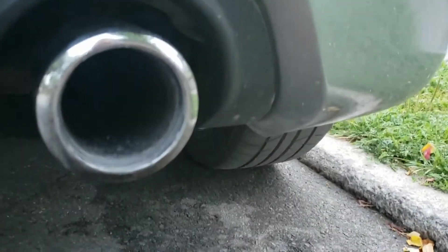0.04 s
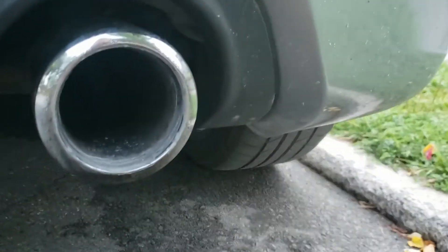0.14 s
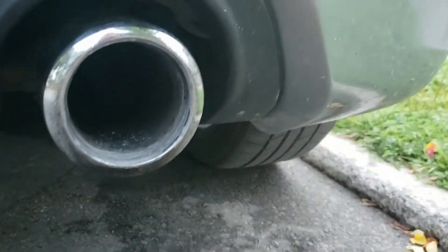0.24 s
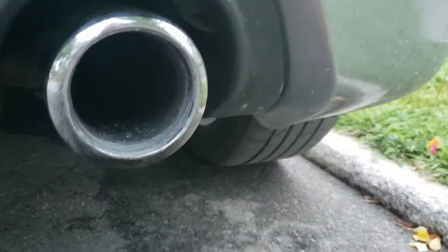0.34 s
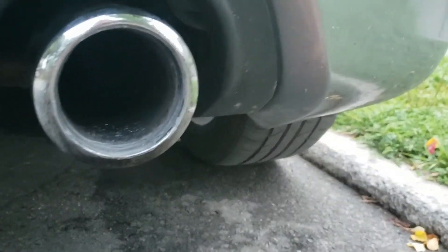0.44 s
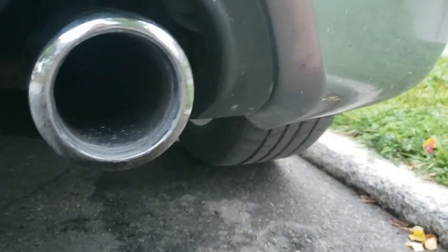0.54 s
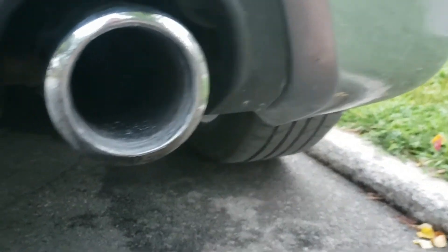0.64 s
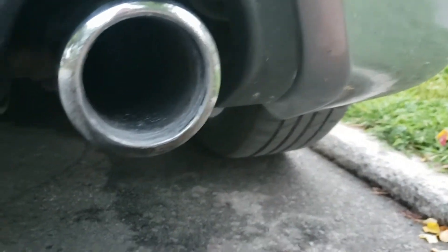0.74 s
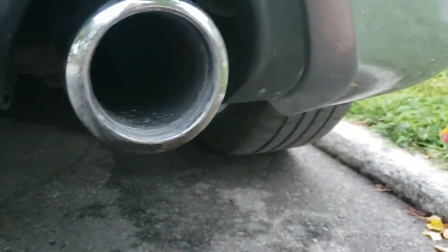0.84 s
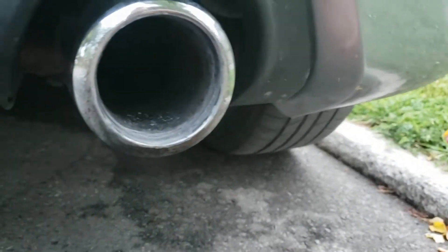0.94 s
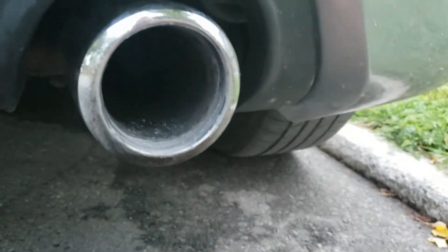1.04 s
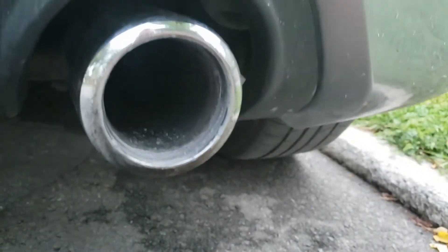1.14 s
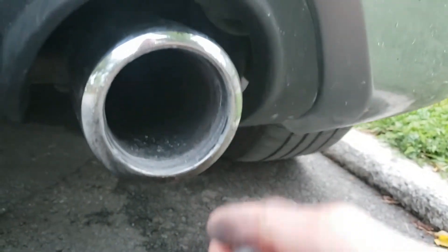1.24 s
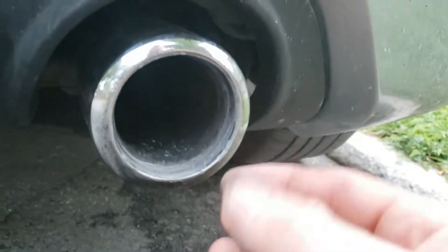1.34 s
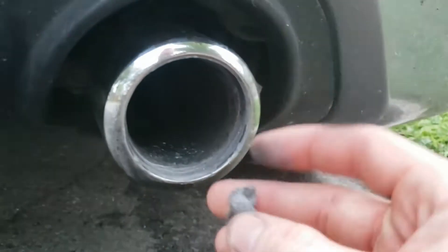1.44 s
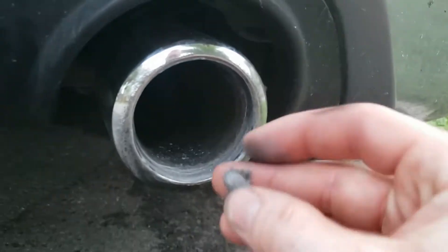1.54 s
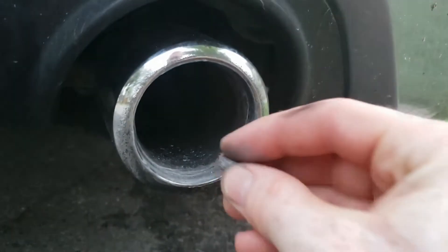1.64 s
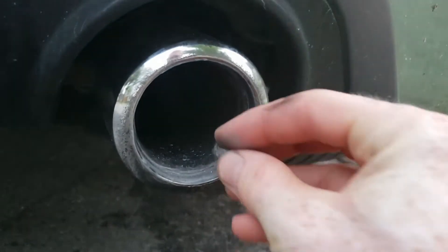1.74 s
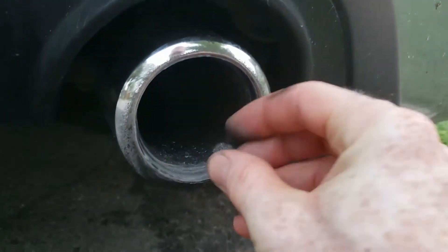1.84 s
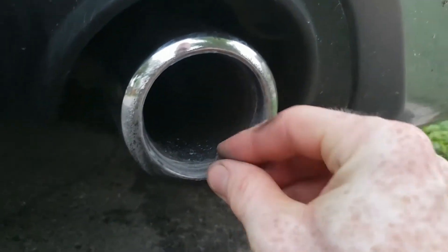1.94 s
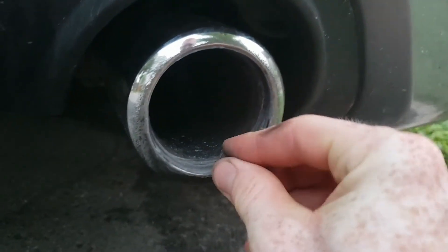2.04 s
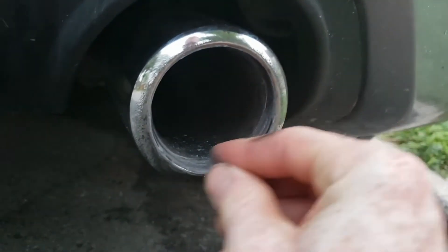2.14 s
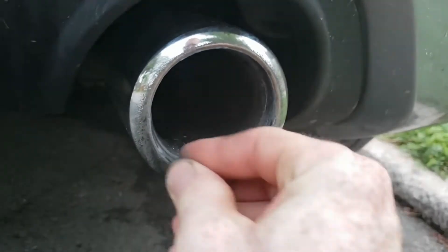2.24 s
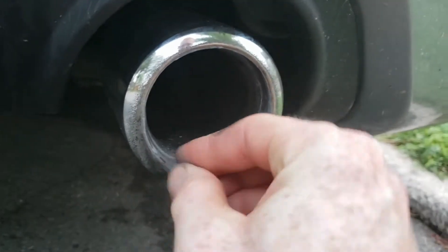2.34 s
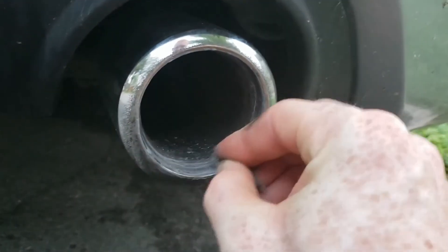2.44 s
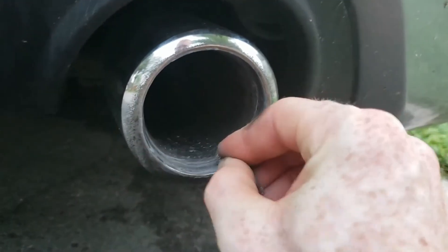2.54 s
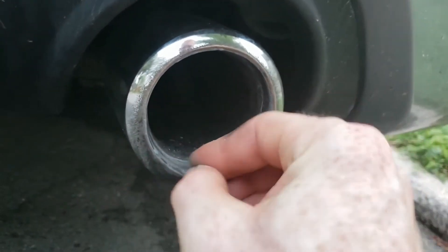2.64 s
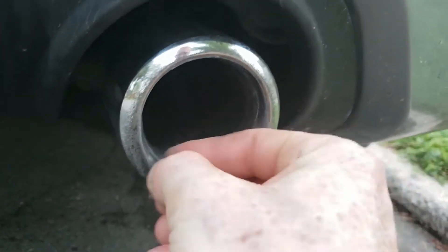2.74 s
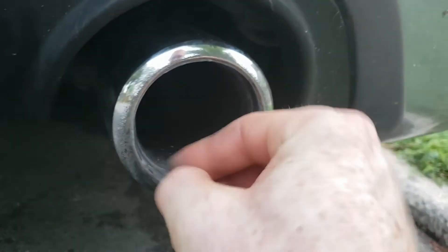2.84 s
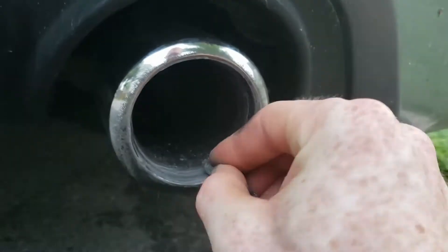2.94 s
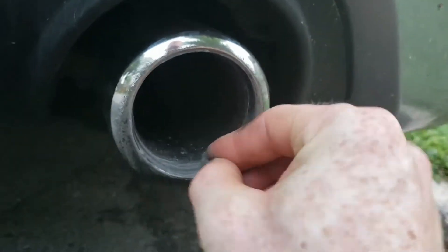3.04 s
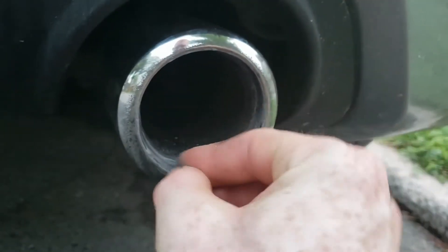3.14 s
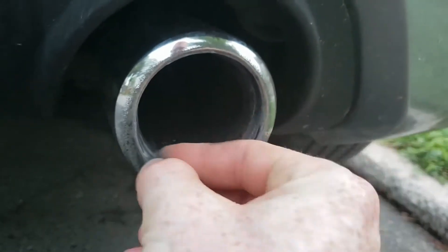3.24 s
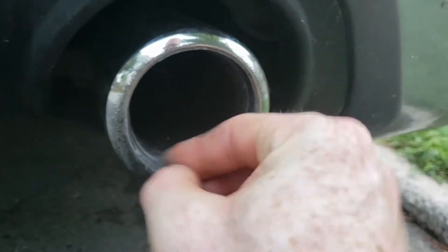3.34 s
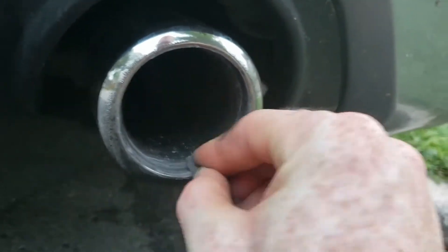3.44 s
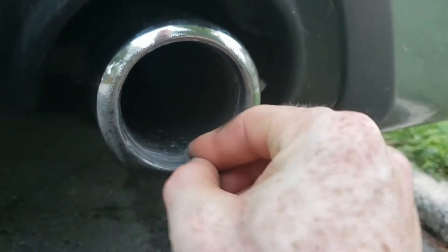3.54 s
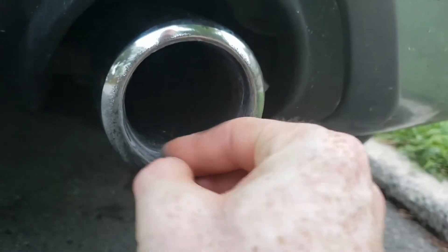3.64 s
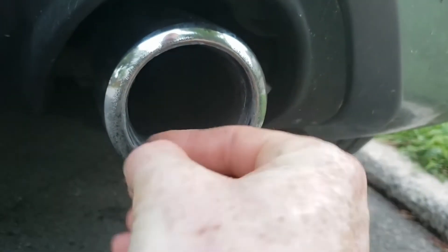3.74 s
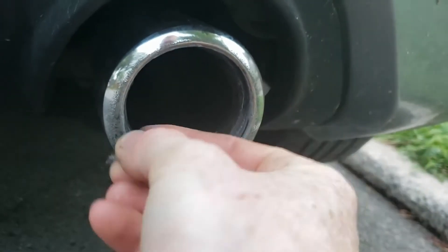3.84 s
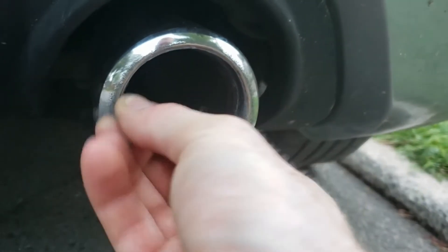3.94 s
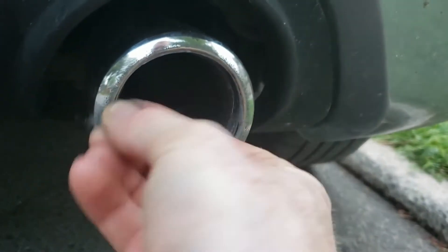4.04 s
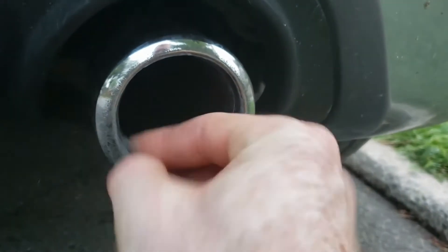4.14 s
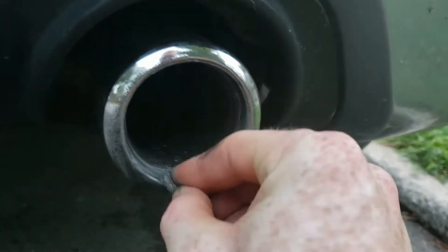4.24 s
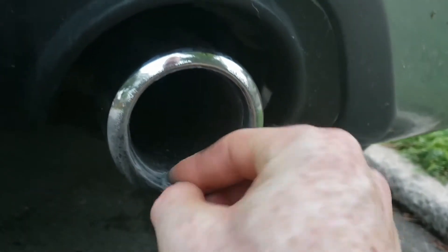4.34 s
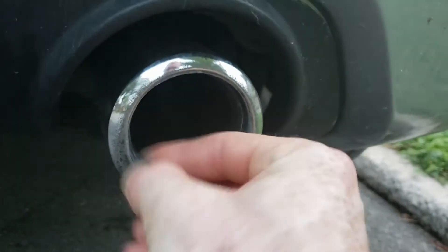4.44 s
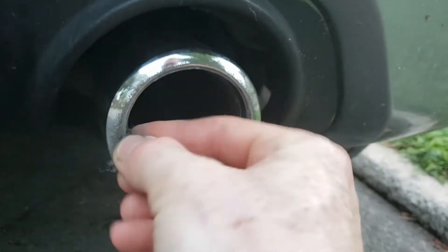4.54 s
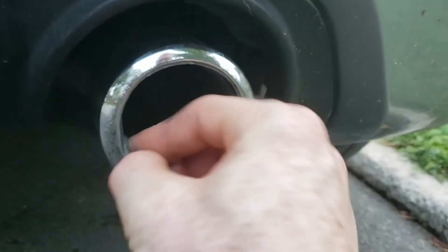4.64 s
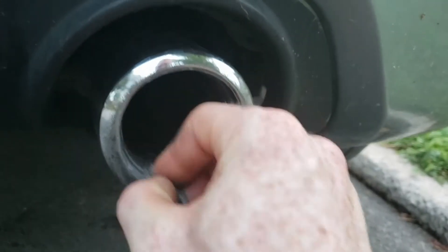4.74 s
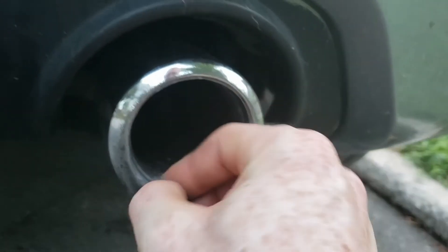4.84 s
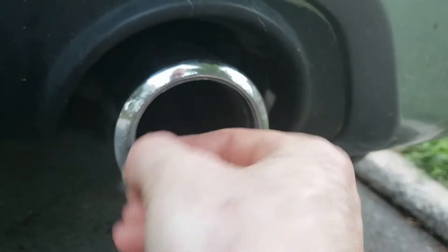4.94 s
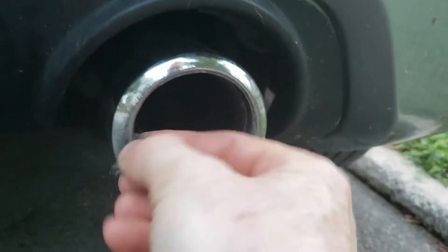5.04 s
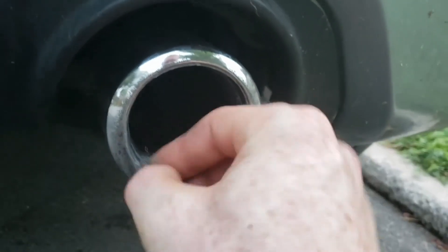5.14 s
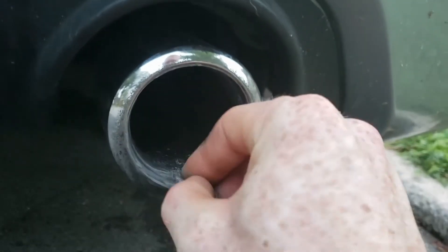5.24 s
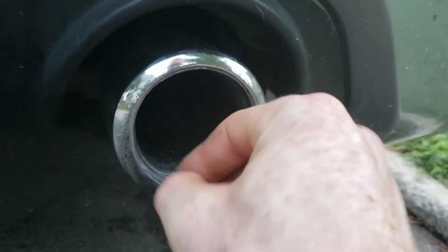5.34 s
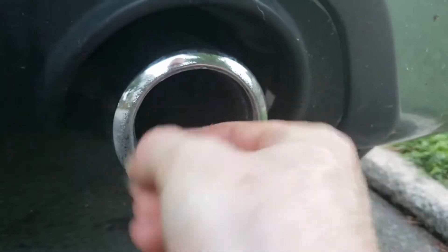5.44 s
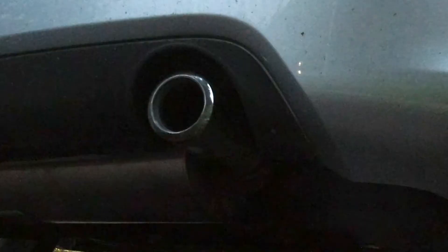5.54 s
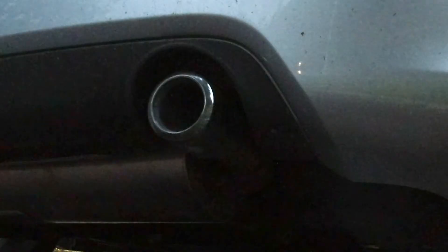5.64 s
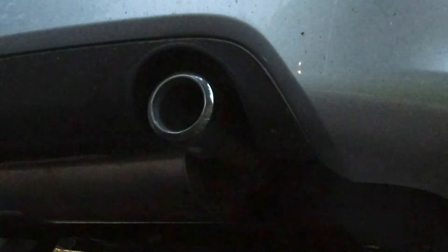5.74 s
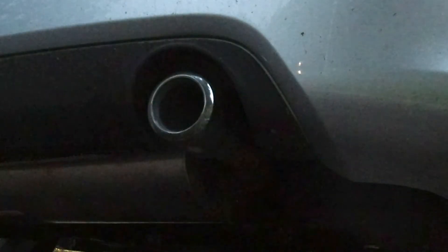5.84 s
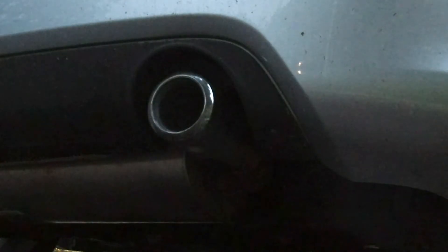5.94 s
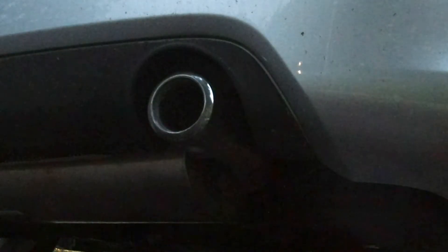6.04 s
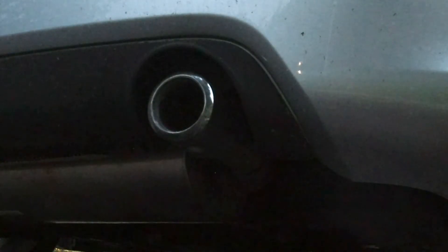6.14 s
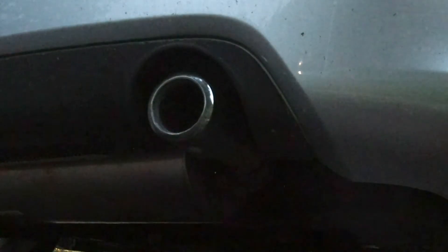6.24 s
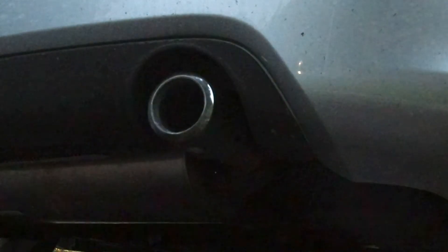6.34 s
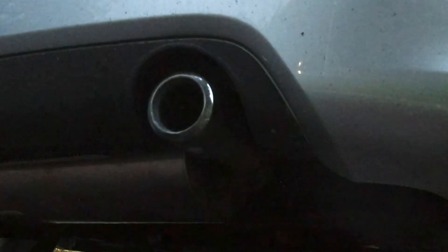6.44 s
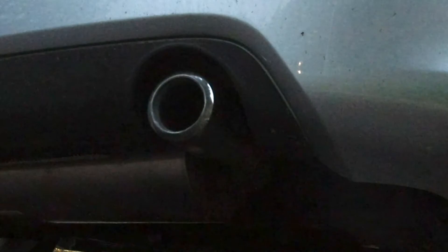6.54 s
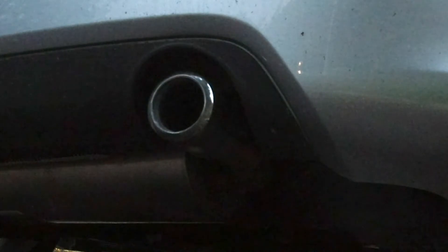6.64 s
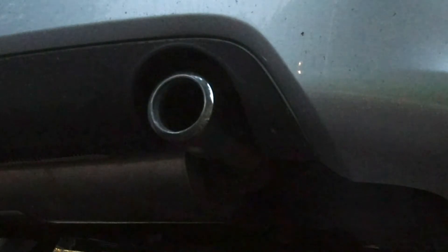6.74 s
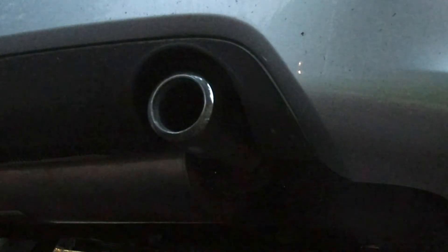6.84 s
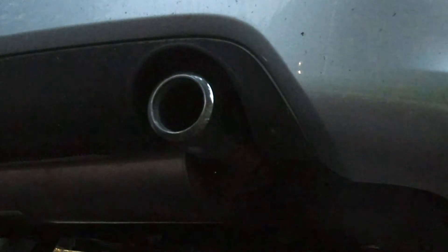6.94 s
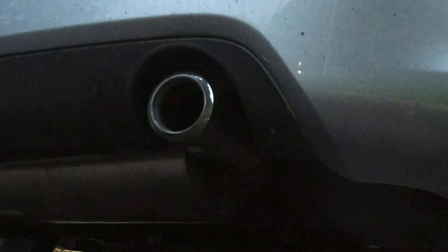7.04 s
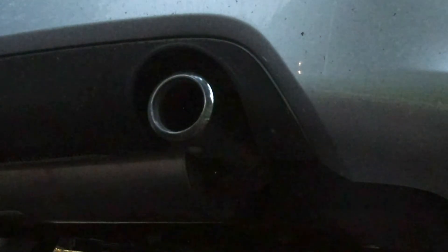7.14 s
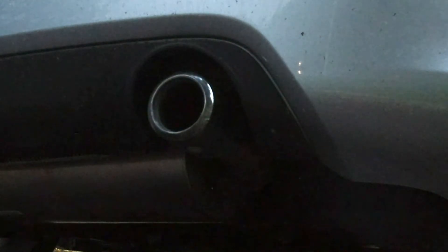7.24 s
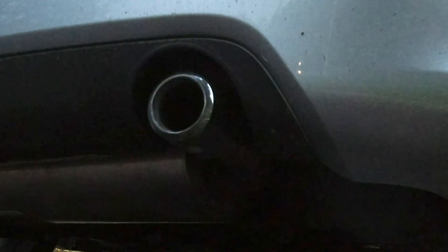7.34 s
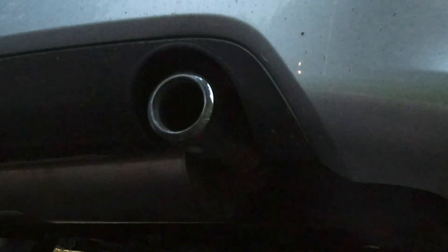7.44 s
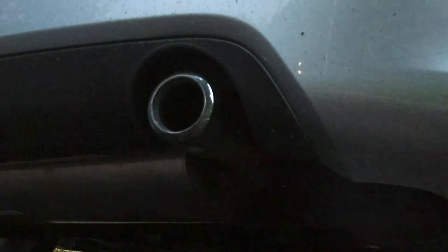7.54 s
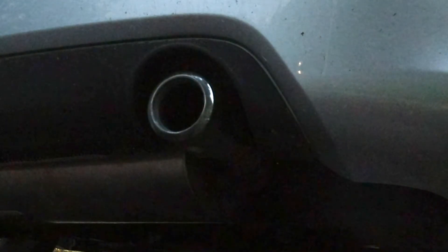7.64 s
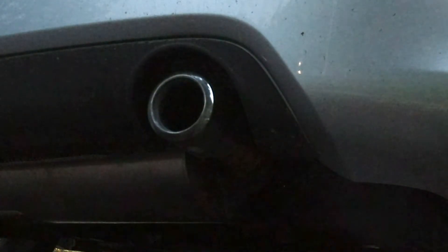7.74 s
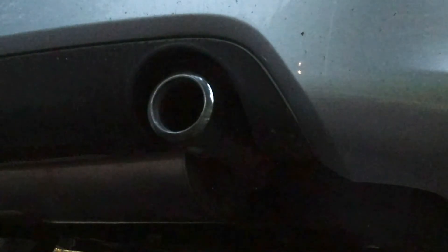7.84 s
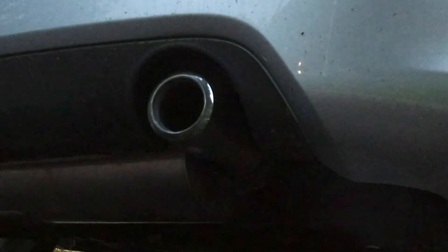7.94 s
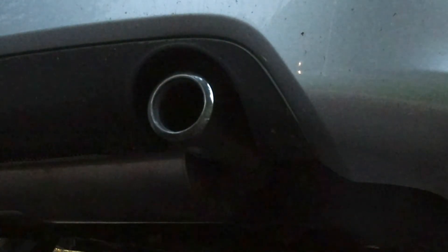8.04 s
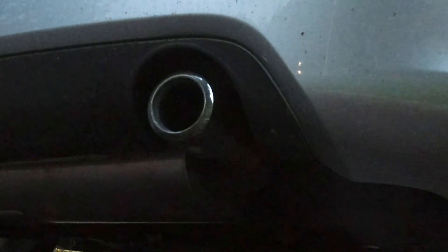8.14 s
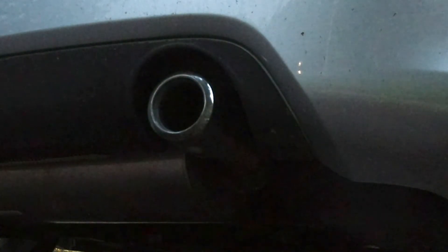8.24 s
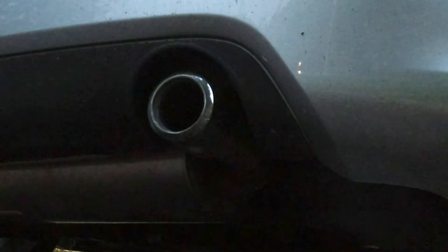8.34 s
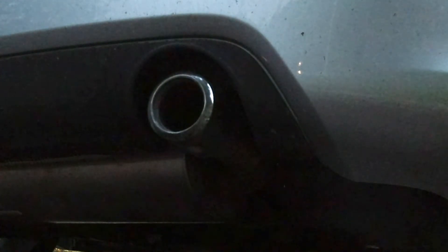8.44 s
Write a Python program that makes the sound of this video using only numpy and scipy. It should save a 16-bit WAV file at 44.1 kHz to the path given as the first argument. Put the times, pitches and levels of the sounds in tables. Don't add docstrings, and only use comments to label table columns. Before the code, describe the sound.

Steel wool rasps in short strokes on a chrome exhaust tip over faint street rumble, then a starter cranks and the engine catches into loud fast idle.

```python
import sys
import numpy as np
from scipy import signal
from scipy.fft import rfft, irfft
from scipy.io import wavfile
from scipy.ndimage import uniform_filter1d

SR = 44100
rng = np.random.default_rng(int(sys.argv[2]) if len(sys.argv) > 2 else 0)


def master_out(mix):
    frames = np.transpose(np.atleast_2d(mix))
    ceiling = np.clip(frames, -1, 1)
    pcm = np.round(ceiling * 32767).astype(np.int16)
    wavfile.write(sys.argv[1], SR, pcm)


def field_ratio(decibels):
    return 10 ** (np.asarray(decibels, dtype=float) / 20)


N = 374409
T = np.arange(N) / SR
HZ = np.maximum(np.fft.rfftfreq(N, 1 / SR), 1)


# time in seconds, firing rate in Hz, load in dB, bite in dB.
IDLE = [(6.37, 40.3, -2, -4), (6.42, 44.4, -1.5, 2.5), (6.465, 55.33, 4, 0), (6.53, 53, 0.5, 3),
        (6.57, 52.34, -0.5, 0.5), (6.72, 52.56, 0.5, 2.5), (7.0, 52.05, -0.5, 0), (7.27, 51.36, -1.5, -1),
        (7.38, 51.85, 0.5, 3), (7.48, 50.76, -0.5, 2.5), (7.53, 49.95, -1.5, -1), (7.64, 50.03, -1, 0),
        (7.72, 51.5, -0.5, 2), (7.88, 51.6, -1, 2), (7.97, 50.4, -2.5, 0), (8.08, 51.34, -1, 1.5),
        (8.16, 49.55, -2, -1), (8.55, 48.5, -1.5, -3)]
# time in seconds, boom loss in dB, bark loss in dB, length in seconds, speed loss in Hz.
STUMBLES = [
    (6.51, -2.5, 10, 0.007, 0),
    (7.177, 8, 3.5, 0.019, 4),
    (7.914, 1.5, 13.5, 0.013, 1.14),
]
FIRST_FIRING_S, RECOVER_S = 6.387, 0.075
BOOM_DB, BARK_DB, BARK_FOLLOW = -22, -29, 0.31
OVERTONE_DB, OVERTONE_KNEE_HZ, OVERTONE_DB_PER_HZ, OVERTONE_LAG_TURNS = -33, 48.76, 2, 0.035
PORT_TURN = 0.0066


def engine():
    hz, load_db, bite_db, gate = over_time(IDLE)
    boom_db = BOOM_DB + load_db
    bark_db = BARK_DB + BARK_FOLLOW * load_db
    for s, boom_loss_db, bark_loss_db, length, loss_hz in STUMBLES:
        hz = hz - loss_hz * np.exp(-((T - s) / RECOVER_S) ** 2)
        dip = np.exp(-((T - s) / length) ** 2)
        boom_db = boom_db - boom_loss_db * dip
        bark_db = bark_db - bark_loss_db * dip
    overtone_db = OVERTONE_DB - OVERTONE_DB_PER_HZ * np.maximum(hz - OVERTONE_KNEE_HZ, 0)

    turns = np.cumsum(hz * (1 + 0.001 * walk(20))) / SR
    turns -= turns[int(FIRST_FIRING_S * SR)] % 1
    swing = turns + PORT_TURN * np.array([[1], [-1]])
    boom = np.cos(2 * np.pi * swing) * field_ratio(boom_db + 0.23 * walk(23))
    overtone = np.cos(2 * np.pi * 2 * (swing - OVERTONE_LAG_TURNS))
    boom = boom - overtone * field_ratio(overtone_db + 0.25 * walk(25))

    barks = bark(turns, bite_db)
    white = ports(GAS_LIKENESS, 0, lag=2.45)
    churn = coloured(white, modes([(60, 60, 0), (250, 220, -12), (690, 24, -12), (515, 30, -18)]))
    pipe = field_ratio(bark_db) * (0.81 * barks + field_ratio(-17.5) * churn)
    return gate * (np.sqrt(2) * boom + pipe + gas(white, turns))


# frequency in Hz, level in dB.
PIPE = [(110, -23.5), (152, -10), (203, -8.5), (245, -18.5), (308, -17.5), (357, -22.5), (410, -38),
        (465, -31), (560, -41), (800, -69.5), (1200, -85)]
# pitch in Hz, width in Hz, level in dB.
PIPE_MODES = [(266, 3.5, -14), (518, 21, -21.5), (616, 6.3, -30), (688, 18.6, -27.5)]
BARK_LAG_S, BITE_HZ = 0.003, 208


def bark(turns, bite_db):
    at = np.nonzero(np.diff(np.floor(turns)))[0]
    timing, strength, snap_strength = rng.standard_normal((3, len(at)))
    late = (timing * 0.00005 * SR).astype(int)
    pulses = np.zeros(N)
    pulses[np.clip(at + late, 0, N - 1)] = field_ratio(0.4 * strength)
    pulses = shape(pulses, np.exp(1j * np.arctan(HZ / 400)))
    delay = np.exp(-2j * np.pi * HZ * BARK_LAG_S)
    barks = unit(shape(pulses, (field_ratio(over_hz(PIPE)) + modes(PIPE_MODES)) * delay))
    upper = shape(barks, 1 / (1 + (BITE_HZ / HZ) ** 10) / (1 + (HZ / 420) ** 10))
    return barks + upper * (field_ratio(bite_db) - 1) + valve_snaps(at, snap_strength)


# time in seconds, snap level in dB.
HARD_OPENINGS = [(6.432, -26), (6.508, -24), (6.526, -27), (6.584, -33), (6.661, -28), (6.718, -39),
                 (6.756, -38), (7.022, -43), (7.043, -29), (7.083, -25), (7.165, -28), (7.383, -31),
                 (7.48, -30), (7.52, -29), (7.679, -41), (7.738, -34), (7.777, -36), (7.835, -41),
                 (7.875, -35), (8.073, -38), (8.152, -28), (8.397, -35)]
SNAP_LAG_S = 0.0029


def valve_snaps(at, strength):
    lag = int(SNAP_LAG_S * SR)
    snaps = np.zeros(N)
    snaps[at + lag] = field_ratio(strength)
    for s, db in HARD_OPENINGS:
        nearest = at[np.argmin(abs(at / SR + BARK_LAG_S - s))]
        snaps[nearest + lag] *= field_ratio(db + 45.0)
    return field_ratio(-28.0) * unit(shape(snaps, modes([(640, 460, -1), (670, 120, -7)]) ** 3))


# frequency in Hz, density in dB per Hz.
GAS = [(410, 0), (700, -5.5), (787, -26), (958, -5), (1150, -17), (1940, -14), (2210, -18.5), (2550, -31),
       (2800, -16), (4540, -28.5), (6210, -24), (6800, -69), (8950, -19), (10200, -32), (15900, -28)]
# frequency in Hz, left-right correlation.
GAS_LIKENESS = [(60, 1), (700, 0.97), (1300, 0.99), (2400, 1), (4400, 0.74), (8000, 0.4), (15000, 0.039)]
# pitch in Hz, width in Hz, level in dB.
SHIELDS = [(2475, 116, 11.5), (8530, 150, -12), (15350, 120, -12), (3115, 140, 4.5), (1930, 16, 6.5)]
GAS_DB = -46.5
FLARE_DB, FLARE_S, FLARE_LENGTH_S = 1.5, 8.9, 0.096


def gas(white, turns):
    gas_db = GAS_DB + FLARE_DB * np.exp(-((T - FLARE_S) / FLARE_LENGTH_S) ** 2)
    rush = coloured(white, field_ratio(over_hz(GAS)))
    rush = rush + field_ratio(-14) * coloured(white, modes(SHIELDS))
    throb = 1 + 0.023 * np.cos(2 * np.pi * (turns - 0.2))
    return patchy(rush, 1.5, 500, 0.04) * throb * field_ratio(gas_db + 1.5 + 0.4 * walk(30))


# frequency in Hz, left-right correlation.
CRANK_LIKENESS = [(60, 1), (700, 1), (1300, 0.95), (2400, 1), (4400, 0.83), (8000, 1), (12000, 1)]
STARTER_ON_S, STARTER_OFF_S, RUN_DOWN_DB_S = 5.508, 6.36, 89


def starter():
    gate = uniform_filter1d(1. * (T > STARTER_ON_S), size=200)
    run_down_db = RUN_DOWN_DB_S * np.maximum(T - STARTER_OFF_S, 0)
    white = ports(CRANK_LIKENESS, 0, lag=2.74 / (1 + (HZ / 8000) ** 4))
    steady = gate * (gear_whirr(white, run_down_db) + air_hiss(white, run_down_db))
    return steady + pinion_blows(white) + knocks_and_squeaks() + pipe_puffs()


# frequency in Hz, density in dB per Hz.
GEARS = [(88, -53), (150, -49), (230, 3.5), (372, -1), (434, -4), (971, -1), (1410, -7.5), (1890, -4.5),
         (9000, -29), (11700, -51), (19800, -120)]
# pitch in Hz, width in Hz, level in dB.
HOUSING = [(352.5, 12, -5), (977, 15.5, 0), (1457, 9.3, 7), (1870, 28, 0), (2405, 75, -1), (2650, 68, -1),
           (2950, 43, 2.5), (3730, 250, -5), (4500, 27, -13), (4840, 32, -11), (5200, 150, -12),
           (6100, 41, -14)]
# time in seconds, whirr level in dB.
STRAINS = [
    (5.516, -34.5),
    (5.585, -38),
    (5.628, -36.5),
    (5.75, -38),
    (5.835, -38),
    (5.922, -33),
    (6.062, -32.5),
    (6.202, -31.5),
    (6.29, -36.5),
    (6.39, -39),
]
STRAIN_RISE_DB_S, STRAIN_FALL_DB_S, COAST_DB = 600, 101, -43.5


def gear_whirr(white, run_down_db):
    levels = [COAST_DB - run_down_db]
    levels += [swell(s, db, STRAIN_RISE_DB_S, STRAIN_FALL_DB_S) for s, db in STRAINS]
    whirr_db = np.max(levels, axis=0)
    whirr = coloured(white, field_ratio(over_hz(GEARS)) * (0.38 + modes(HOUSING)))
    return patchy(whirr, 4.05, 300, 0.015) * field_ratio(whirr_db - 2.5 + 1.7 * walk(120))


# frequency in Hz, density in dB per Hz.
JET = [(1760, -12.5), (3000, -0.5), (4620, -1), (9100, -2), (10000, -6), (12000, -4.5), (15900, -17)]
# pitch in Hz, width in Hz, level in dB.
WHINES = [(4020, 43, 3), (5260, 45, 2), (6080, 30, 1), (9250, 16, 1), (2050, 28, 0)]
# time in seconds, held in seconds, hiss level in dB.
HISSES = [
    (5.508, .002, -50),
    (5.7, 0.092, -52.5),
    (5.865, 0.043, -46),
    (6.005, 0.032, -43),
    (6.14, 0.044, -42),
    (6.282, 0.073, -36.5),
]
HISS_RISE_DB_S, HISS_FALL_DB_S, LEAK_DB = 500, 196, -69


def air_hiss(white, run_down_db):
    levels = [LEAK_DB - run_down_db]
    for s, held, db in HISSES:
        rise = swell(s, db, HISS_RISE_DB_S, 0)
        fall = swell(s + held, db, 0, HISS_FALL_DB_S)
        levels.append(np.minimum(rise, fall))
    hiss_db = np.max(levels, axis=0)
    jet = coloured(white, field_ratio(over_hz(JET)) * (1 + field_ratio(6.0) * modes(WHINES)))
    return patchy(jet, 3.5, 900, 0.03) * field_ratio(hiss_db + 0.3 + 1.1 * walk(80))


# time in seconds, peak in dB, pitch in Hz, held in seconds, t60 in seconds.
BLOWS = [
    (5.51, -18.5, 2590, 0.0097, 0.065),
    (5.585, -35.5, 1050, 0.072, 0.14),
    (5.61, -44, 1970, 0.01, 0.065),
    (5.745, -36, 1030, 0.057, 0.27),
    (5.806, -33, 2330, 0.0087, 0.1),
    (5.918, -31.5, 1870, 0.023, 0.13),
    (6.057, -32, 1870, 0.037, 0.12),
    (6.195, -41, 1870, 0.033, 0.1),
    (6.03, -48, 4050, 0.016, 0.082),
    (6.295, -36.5, 2620, 0.057, 0.18),
]
BLOW_RISE_S = 0.0099


def pinion_blows(white):
    out = 0
    noise = irfft(white, N)
    for s, db, hz, held, t60 in BLOWS:
        rise = np.clip((T - s) / min(BLOW_RISE_S, held / 4), 0, 1)
        decay = field_ratio(-60 * np.maximum(T - s - held, 0) / t60)
        metal = modes([(hz, 1800, 0), (hz, 60, 7), (964, 70, -2), (1510, 40, 3), (4500, 900, -8)])
        rattle = shape(noise * rise * decay, metal)
        out = out + rattle * field_ratio(db) / abs(rattle).max()
    return out


# time in seconds, peak in dB, pitch in Hz, t60 in seconds.
KNOCKS = [
    (5.52, -34.5, 620, 0.13),
    (5.811, -35.5, 349, 0.11),
    (5.92, -34, 358, 0.23),
    (6.149, -35, 274, 0.11),
    (6.33, -27, 111, .15),
]
# time in seconds, peak in dB, pitch in Hz, t60 in seconds.
SQUEAKS = [
    (5.61, -33.5, 1980, .1),
    (5.76, -39.5, 4040, 0.13),
    (5.85, -41, 4660, .1),
    (6.0, -42, 5250, 0.17),
    (6.025, -39, 4170, .1),
    (6.19, -39, 5200, 0.11),
    (6.21, -33, 1870, .1),
    (6.285, -45, 4000, .1),
    (6.35, -42, 4050, .08),
]


def knocks_and_squeaks():
    out = 0
    for s, db, hz, t60 in KNOCKS + SQUEAKS:
        since = np.maximum(T - s, 0)
        level = field_ratio(db - 60 * since / t60) * np.minimum(since / 0.0053, 1)
        out = out + level * np.sin(2 * np.pi * hz * since)
    return out


# time in seconds, peak in dB, push in seconds, ring in Hz.
PUFFS = [
    (5.687, -29, 0.003, 23.5),
    (5.853, -24.5, 0.0017, 22.3),
    (5.991, -28, 0.0036, 22.8),
    (6.131, -23, 0.0011, 22.1),
    (6.268, -26.5, 0.0044, 22.3),
    (7.2, -37, 0.0099, 22),
    (6.324, -21.5, 0.0032, 62),
    (6.36, -17, 0.0018, 60),
]


def pipe_puffs():
    out = 0
    for s, db, push, ring_hz in PUFFS:
        build = np.exp(-abs(T - s) / np.where(T < s, push, 0.81 * push))
        build -= 0.45 * np.roll(build, int(0.56 / ring_hz * SR))
        puff = shape(build, modes([(ring_hz, 0.66 * ring_hz, 0), (75, 60, -14)]))
        out = out + puff * field_ratio(db) / puff.max()
    return out


# frequency in Hz, density in dB per Hz.
WOOL = [(290, -64), (500, -12.5), (795, -20), (932, -9.5), (1140, -8.5), (1260, -13), (1500, -2.5),
        (1690, -16), (3280, -16), (5070, -19.5), (6390, -7), (7820, -17), (8660, -21), (12100, -10.5),
        (15900, -15.5)]
# pitch in Hz, width in Hz, level in dB (all sound alike here).
SHELL = [(3330, 15, -6), (3510, 10, -11), (4710, 130, -11), (5490, 88, -6), (6400, 18, -2), (7210, 130, -4),
         (7570, 120, -5), (7570, 120, 0), (7070, 18, -8), (7880, 110, -9.5), (9100, 320, -11),
         (10000, 22, -6), (11700, 190, -8), (12200, 300, -3), (13700, 43, -7), (14400, 16, -7),
         (14600, 34, -7), (15000, 300, -6)]
# time in seconds, loss in dB, length in seconds.
CATCHES = [
    (3.581, 15, 0.036),
    (4.49, 10, 0.015),
    (4.963, 10, 0.018),
    (5.379, 13.5, 0.046),
]


def scrub():
    rasp_db = pushes()
    for s, loss_db, length in CATCHES:
        side = np.where(T < s, length, 0.3 * length)
        rasp_db = rasp_db - loss_db * np.exp(-((T - s) / side) ** 2)
    lag = -14 / (1 + (HZ / 5500) ** 4)
    white = ports([(500, .6), (2000, .5), (5000, .35), (15000, .75)], over_hz(LEAN), lag)
    snags = field_ratio(1.3 * walk(90) + 2.0 * walk(500))
    shell = modes([(hz, min(width, 80), -1.5) for hz, width, _ in SHELL])
    rasp = coloured(white, field_ratio(over_hz(WOOL)) * (0.51 + shell))
    return patchy(rasp, 3.35, 200, 0.062) * field_ratio(rasp_db) * snags + rim_ring(white, rasp_db)


# full contact in seconds, held in seconds, rasp level in dB.
PUSHES = [(1.99, 0.019, -62), (2.196, 0.072, -43), (2.426, 0.068, -43.5), (2.652, 0.064, -42.5),
          (2.768, .0084, -39.5), (2.903, 0.068, -44.5), (3.134, .089, -43), (3.28, .006, -49.5),
          (3.409, 0.037, -44.5), (3.622, .19, -45.5), (3.872, 0.013, -47), (3.967, .027, -45),
          (4.16, 0.042, -46.5), (4.214, .045, -43.5), (4.44, .039, -48), (4.505, 0.025, -43.5),
          (4.706, 0.046, -42), (4.8, 0.005, -51.5), (4.944, .078, -43), (5.165, 0.11, -42.5),
          (5.397, .05, -43), (5.491, .02, -40)]
PRESS_DB_S, LIFT_DB_S, TIRE_DB_S = 290, 439, 13
RESTING_DB, RESTING_S = -67.5, 1.94


def pushes():
    rasp_db = swell(RESTING_S, RESTING_DB, 66, 0)
    for s, held, db in PUSHES:
        lift_db = LIFT_DB_S * np.maximum(T - s - held, 0)
        rasp_db = np.maximum(rasp_db, swell(s, db, PRESS_DB_S, TIRE_DB_S) - lift_db)
    return rasp_db


# (start in seconds, held in seconds, ring level in dB).
TIP_MODES = [
    ((1530, 23, -69), [(2.19, .03, -58), (2.26, 0.044, -50), (2.45, 0.079, -60), (2.65, 0.043, -53.5), (2.735, 0.049, -50.5), (2.94, .02, -53.5), (3.18, 0.11, -46.5), (3.44, 0.012, -54), (3.655, 0.083, -50.5), (3.78, .04, -60), (4.265, 0.016, -55), (4.7, .06, -66), (4.93, .05, -67), (5.225, 0.023, -54), (5.285, 0.014, -57), (5.43, 0.078, -55)]),
    ((1350, 19, -71), [(2.8, .01, -58), (3.88, .01, -59), (3.97, 0.035, -51.5), (4.19, 0.026, -56), (4.52, .02, -54.5), (4.71, 0.06, -57.5), (5.035, 0.02, -51), (5.46, .04, -56)]),
    ((1930, 33, -72), [(2.94, .015, -62), (3.29, .02, -63), (3.78, .03, -56.5), (3.88, 0.0092, -55), (3.975, .015, -59)]),
    ((3380, 24, -77.5), [(2.22, 0.084, -63), (2.68, .08, -61)]),
    ((553, 9.4, -76), [(2.3, .03, -66), (3.3, .03, -62), (3.99, .02, -60), (5.02, .03, -62)]),
             ((1135, 22, -74), [(2.195, .035, -50.5), (2.47, .04, -63), (2.655, .04, -56.5), (2.77, .015, -57), (2.955, .03, -61), (3.125, .02, -56), (3.275, .03, -60), (3.445, .02, -60), (3.62, .04, -61), (3.715, .02, -54.5), (4.23, .04, -64), (5.41, .07, -63)]),
    ((1040, 4.6, -82), [(2.19, .05, -62), (2.29, .1, -58.5), (2.46, .14, -68), (2.67, .05, -63), (2.78, .18, -60), (3.17, 0.21, -58), (3.62, .08, -62), (3.73, .11, -58), (4.98, .08, -62), (5.42, .06, -63)]),
    ((958, 14, -76), [(2.2, .03, -61), (2.68, .02, -58), (3.215, .015, -57), (3.625, .04, -59), (5.25, .03, -63)]),
]
RING_FOLLOW, RING_RISE_DB_S, RING_FALL_DB_S = 0.45, 350, 402


def rim_ring(white, rasp_db):
    out = 0
    for (hz, width, idle_db), moments in TIP_MODES:
        ring_db = idle_db + RING_FOLLOW * (rasp_db + 47.5)
        for s, held, db in moments:
            fall_db = RING_FALL_DB_S * np.maximum(T - s - held, 0)
            ring_db = np.maximum(ring_db, swell(s, db, RING_RISE_DB_S, 0) - fall_db)
        out = out + sing(white, (hz, width, 0), ring_db + 2.0)
    return out


STEADY_S, STEADINESS = 0.004, 0.7


def sing(white, mode, db):
    hz, width, _ = mode
    response = modes([mode])
    ring = irfft(white * response, N)
    strength = uniform_filter1d(np.mean(ring ** 2, axis=0), int(STEADY_S * SR))
    drive = ring * (strength / strength.mean() + 0.02) ** (-STEADINESS / 2)
    lead = np.std(irfft(white.mean(0) * response, N))
    return shape(drive * field_ratio(db), modes([(hz, 1.9 * width, 0)])) / lead


# time in seconds, peak in dB, pitch in Hz, width in Hz.
CREAKS = [
    (0.119, -67, 6300, 1500),
    (0.118, -73, 4500, 2500),
    (0.806, -65, 13000, 2800),
    (0.806, -67, 6500, 2000),
    (1.2077, -69, 5400, 2700),
]


def hand_creaks():
    out = 0
    for s, db, hz, width in CREAKS:
        burst = rng.standard_normal((2, N)) * (T > s) * np.exp(-np.maximum(T - s, 0) / 0.011)
        burst = shape(burst, modes([(hz, width, 0)]) ** 2)
        out = out + burst * field_ratio(db + 13.0) / abs(burst).max() * np.array([[1.5], [0.5]])
    return out


# time in seconds, level in dB.
TRUCK_REVS = [
    (0.01, -37),
    (1.232, -40.5),
    (1.63, -48),
    (2.14, -35.5),
    (2.7, -38),
    (3.298, -40),
    (4.805, -39.5),
    (5.39, -42),
]
TRUCK_HZ, TRUCK_DB, TRUCK_SWELL_DB_S = 146.5, -52, 44


def truck():
    revs_db = [swell(s, db, TRUCK_SWELL_DB_S, TRUCK_SWELL_DB_S) for s, db in TRUCK_REVS]
    level_db = np.maximum(np.max(revs_db, axis=0), TRUCK_DB)
    drone = tone(np.full(N, TRUCK_HZ), level_db, 0.7, 14.0)
    return drone * field_ratio(-3.0 + np.array([[1.2], [-1.2]]))


# time in seconds, pitch in Hz, level in dB.
WHISTLE = [
    [(0, 3500, -72), (.11, 3470, -75), (.17, 3460, -82)],
    [(.14, 2880, -77), (.3, 2960, -74), (.55, 2990, -69.5), (.9, 3060, -78), (1.1, 3120, -100)],
    [(1.85, 2710, -92), (1.97, 2930, -74), (2.2, 3050, -70), (2.4, 3050, -70)],
]


def insect():
    calls = [tone(*over_time(call), spread_hz) for call, spread_hz in zip(WHISTLE, (45, 90, 140))]
    return sum(calls) * np.array([[1.7], [0.3]])


# frequency in Hz, density in dB per Hz.
STREET = [(15, -60), (25, -49), (40, -11), (82, -1.5), (224, -12.5), (305, -20), (362, -21), (537, -30),
          (671, -34), (1500, -40.5), (1950, -71), (3300, -120)]
# frequency in Hz, density in dB per Hz.
AIR = [(880, -37), (1500, -27), (1740, -7), (1900, -6), (2200, -0.5), (2820, -10.5), (3540, -26.5),
       (4490, -23.5), (4630, -27), (4910, -14.5), (5580, -22), (7430, -18), (8280, -42), (11100, -30.5),
       (15900, -26.5)]
# frequency in Hz, left-right correlation.
LIKENESS = [(60, 0.96), (130, 0.99), (290, 0.9), (640, 0.23), (1410, -0.41), (3100, 0.57), (6820, -1),
            (15000, -0.02)]
# frequency in Hz, left minus right in dB.
LEAN = [(60, 0), (110, 3.5), (200, 2), (380, 3.5), (700, 2.5), (1290, 9), (2380, 24), (4400, 6),
        (8120, 15.5), (15000, -1)]
STREET_DB, AIR_DB = -43, -65.5


def street():
    white = ports(LIKENESS, over_hz(LEAN), lag=-10.5)
    rumble = coloured(white, field_ratio(over_hz(STREET))) * field_ratio(STREET_DB - 1.2 + 0.9 * walk(4))
    hiss = patchy(coloured(white, field_ratio(over_hz(AIR))), 0.96, 700, 0.16) * field_ratio(AIR_DB)
    return rumble + hiss


def yard():
    return coloured(ports(GAS_LIKENESS, 0, lag=2), field_ratio(over_hz(STREET))) * field_ratio(-49.0)


def unit(x):
    return x / np.sqrt(np.mean(x ** 2))


def over_hz(table):
    hz, value = np.transpose(table)
    return np.interp(np.log(HZ), np.log(hz), value)


def over_time(table):
    s, *columns = np.transpose(table)
    gate = uniform_filter1d(1. * (T > s[0]) * (T < s[-1]), size=200)
    return [np.interp(T, s, c) for c in columns] + [gate]


def swell(s, db, rise_db_s, fall_db_s):
    return db - rise_db_s * np.maximum(s - T, 0) - fall_db_s * np.maximum(T - s, 0)


def shape(x, gain):
    return irfft(rfft(x) * gain, N)


def modes(table):
    return sum(field_ratio(db) / (1 + 1j * (HZ - hz ** 2 / HZ) / width) for hz, width, db in table)


def walk(rate):
    k = int(SR / rate)
    steps = np.repeat(rng.standard_normal(N // k + 1), k)
    return 0.85 * uniform_filter1d(uniform_filter1d(steps, k), k)[:N]


def ports(likeness, lean_db, lag):
    share = np.clip(over_hz(likeness), 0, 1)
    both, left, right = rfft(rng.standard_normal((3, N)))
    delay = np.exp(-2j * np.pi * HZ * lag / SR)
    left = np.sqrt(share) * both * delay + np.sqrt(1 - share) * left
    right = np.sqrt(share) * both + np.sqrt(1 - share) * right
    a, b = field_ratio(lean_db / 2), field_ratio(-lean_db / 2)
    return np.array([a * left, b * right]) * 2 / np.sqrt(a * a + b * b + 2 * share)


def coloured(white, gain):
    x = irfft(white * gain, N)
    return x / np.sqrt(np.mean(x.mean(0) ** 2))


def patchy(x, db, width_hz, hold_s):
    _, _, z = signal.stft(x, nperseg=256)
    field = rng.standard_normal(z.shape[-2:])
    for axis, size in enumerate((width_hz * 256 / SR, hold_s * SR / 128)):
        size = max(int(size), 1)
        field = uniform_filter1d(uniform_filter1d(field, size, axis), size, axis)
    y = signal.istft(z * field_ratio(db * unit(field)), nperseg=256)[1][..., :N]
    return y * np.std(x) / np.std(y)


def tone(hz, db, gate, spread_hz):
    wobble = unit(shape(rng.standard_normal(N), 1 / (1 + (HZ / spread_hz) ** 2)))
    return np.sqrt(2) * wobble * np.sin(2 * np.pi * np.cumsum(hz) / SR) * field_ratio(db) * gate


CHANGE_S = 5.505


def scene():
    before = np.clip((CHANGE_S - T) / 0.044 + 0.5, 0, 1)
    close_up = scrub() + hand_creaks() + truck() + insect() + street()
    return engine() + starter() + before * close_up + (1 - before) * yard()


def top_cut(x):
    return signal.sosfilt(signal.butter(12, 15900, fs=SR, output="sos"), x)


def record(dry):
    mix = shape(dry, HZ < 15830)
    return top_cut(mix)


dry = scene()
out = record(dry)
master_out(out)
```